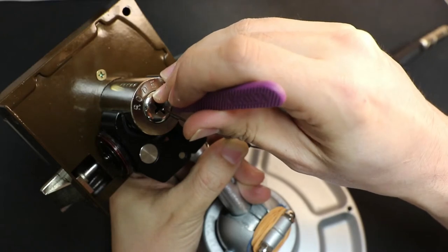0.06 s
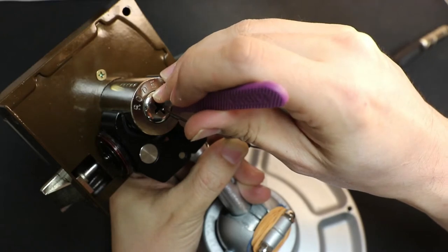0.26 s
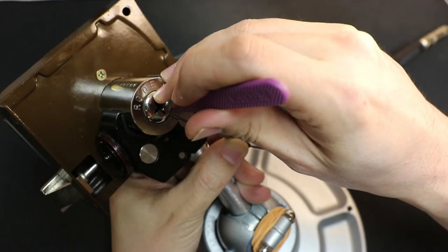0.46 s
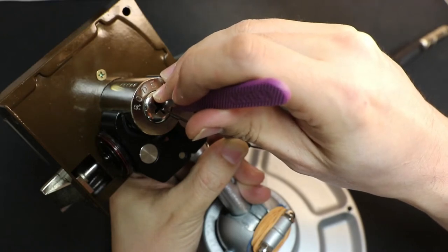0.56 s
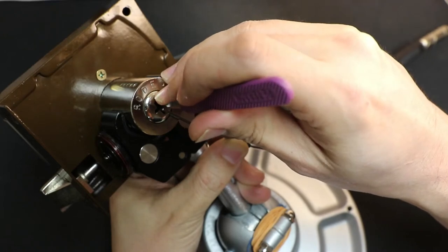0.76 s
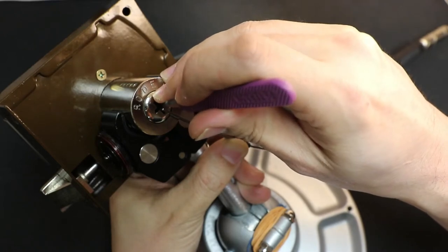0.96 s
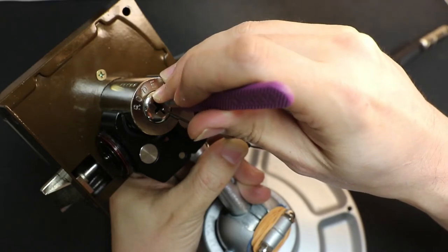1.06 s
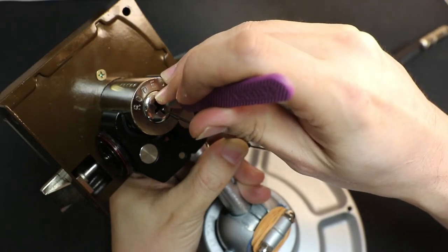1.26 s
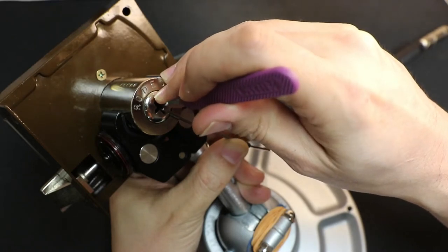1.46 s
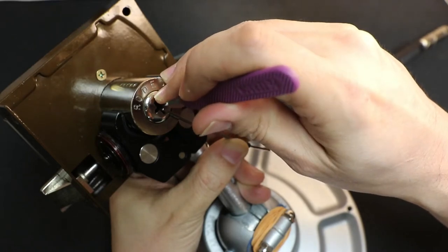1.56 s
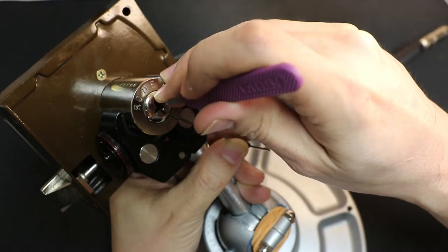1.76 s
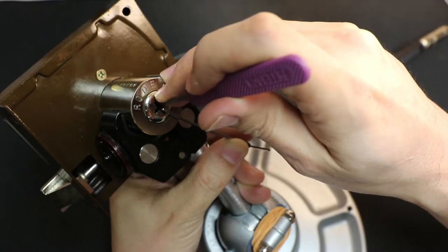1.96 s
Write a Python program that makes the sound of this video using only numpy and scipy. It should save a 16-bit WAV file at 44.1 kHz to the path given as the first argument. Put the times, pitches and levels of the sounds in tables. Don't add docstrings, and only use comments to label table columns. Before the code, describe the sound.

A thin steel pick works the pins of a lock cylinder, giving small ticks and gritty scrapes, then one much louder sharp click just past the middle; close mono microphone in a quiet room with faint hiss and hum.

```python
import sys
import numpy as np
from scipy import signal
from scipy.fft import rfft, irfft, next_fast_len
from scipy.io import wavfile
from scipy.ndimage import uniform_filter1d, map_coordinates

SR = 44100
rng = np.random.default_rng(int(sys.argv[2]) if len(sys.argv) > 2 else 0)


def decibels_to_gain(level_db):
    exponent = np.asarray(level_db, float) / 20
    return 10 ** exponent


def pcm_store(signal):
    levels = np.round(np.clip(np.atleast_2d(signal), -1, 1) * 32767)
    wavfile.write(sys.argv[1], SR, levels.astype(np.int16).T)


N = 88596


def unit(x):
    return x / np.sqrt(np.mean(x ** 2) + 1e-20)


def along(points, hz):
    point_hz, value = np.transpose(points)
    return np.interp(np.log(hz + 1), np.log(point_hz + 1), value)


def wobble(rate_hz):
    knots = rng.standard_normal(int(N * rate_hz / SR) + 4)
    return map_coordinates(knots, [np.arange(N) * rate_hz / SR])


def filtered(x, response):
    size = next_fast_len(len(x) + 4096)
    spectrum = rfft(x, size) * response(np.fft.rfftfreq(size, 1 / SR))
    return irfft(spectrum, size)[:len(x)]


def resonance(f, hz, width_hz):
    return 1j * f * width_hz / (hz * hz - f * f + 1j * f * width_hz)


def room_tone():
    # hz, level_db [dB per Hz]
    rumble = [(15, -14.5), (30, -0.5), (45, -14), (90, -2), (200, -1), (400, -6), (800, -9), (1500, -11.5)]
    # hz, level_db [dB per Hz]
    mic_hiss = [(1500, 1), (3000, -2), (4500, -7), (6500, -6.5), (9000, -6.5), (13000, -16), (15600, -10),
                (15900, -50)]
    # hz, level_db
    mains = [(60, -65), (180, -69.5), (240, -80), (300, -78.5), (420, -78.5), (540, -82.5), (600, -82.5)]
    t = np.arange(N) / SR
    noise = filtered(rng.standard_normal(N), lambda hz: decibels_to_gain(along(rumble, hz) + along(mic_hiss, hz)))
    out = decibels_to_gain(-59 + 0.28 * wobble(4.1)) * unit(noise)
    for hz, db in mains:
        level = np.sqrt(2) * decibels_to_gain(db + 0.6 * wobble(5.8))
        phase = 2 * np.pi * (hz * t + rng.random()) + 0.15 * wobble(3.8)
        out += level * np.sin(phase)
    return out


def rustle():
    # time_s, level_db
    rub = [(0.0, -69.5), (2.01, -71)]
    # hz, level_db [dB per Hz]
    spectrum = [(800, -28), (2500, 6), (6000, -5), (12000, 8), (15600, -4), (15900, -50)]
    time_s, db = np.transpose(rub)
    noise = unit(filtered(rng.standard_normal(N), lambda hz: decibels_to_gain(along(spectrum, hz))))
    sway_db = 1.1 * wobble(25.3) + 1.3 * wobble(150)
    return decibels_to_gain(np.interp(np.arange(N) / SR, time_s, db) + sway_db) * noise


def scrapes():
    # start_s, length_s, level_db, pitch_hz
    strokes = [(.085, 0.058, -65, 1770), (.172, 0.048, -67, 3270), (0.245, .012, -59, 7440),
               (0.276, 0.023, -61, 2510), (.37, 0.021, -64, 3130), (0.447, 0.024, -59, 3440),
               (0.477, 0.0094, -54.5, 4500), (0.487, 0.016, -59, 3200), (.666, 0.017, -57, 2450),
               (.745, 0.018, -55, 6200), (.748, .012, -62, 2430), (.914, 0.015, -64, 5040),
               (1.236, 0.009, -59, 3300), (0.929, 0.015, -58, 6000), (0.945, 0.019, -60, 6140),
               (1.068, 0.046, -65, 2460), (1.111, 0.03, -56.5, 2500), (1.111, 0.022, -54.5, 7460),
               (1.114, 0.023, -59, 4170), (.575, .012, -63, 2450), (0.859, 0.011, -62, 2700),
               (1.869, 0.038, -65.5, 5000), (0.541, .007, -55.5, 7600), (.542, 0.0069, -55, 2420),
               (0.72, 0.0072, -54, 9700), (.376, .014, -63, 8800), (0.273, .03, -72, 8900)]
    q, grit_db = 8.5, 2.5
    out = np.zeros(N + SR)
    for start_s, length_s, db, hz in strokes:
        noise, grit = rng.standard_normal((2, int(length_s * SR)))
        grit = noise * decibels_to_gain(grit_db * unit(uniform_filter1d(grit, size=30)))
        tone = filtered(grit, lambda f: resonance(f, hz, hz / q))
        envelope = np.sqrt(np.hanning(len(tone)))
        out[round(start_s * SR):][:len(tone)] += decibels_to_gain(db) * unit(tone) * envelope
    return out[:N]


def ring(modes, blow):
    detune, scatter_db = 0.0031, 2
    hz, width_hz, db = np.transpose(modes)[:, :, None]
    pitch_luck, level_luck = rng.standard_normal((2, len(modes), 1))
    sign = (-1.) ** np.arange(len(modes))[:, None]
    hz = hz * (1 + detune * pitch_luck)
    gain = sign * decibels_to_gain(db + scatter_db * level_luck)
    out = filtered(blow, lambda f: np.sum(gain * resonance(f, hz, width_hz), axis=0))
    return out / np.abs(out).max()


def pins():
    # start_s, pick_db, cylinder_db, chatter_ms
    ticks = [(0.1706, -48, -50, 2.4), (0.1783, -46, -42, 2.4), (0.182, -41, -48, 2.4),
             (0.1901, -44, -47, 2), (0.1991, -37, -43, 1.6), (0.203, -41, -47, 2.4),
             (0.2329, -43.5, -48, 2), (0.2463, -46, -49, 1.7), (0.3834, -33.5, -44.5, 1.6),
             (0.4777, -49, -46.5, 1.5), (0.5023, -43.5, -50, 1.7), (0.543, -57, -46, 2.4),
             (0.5791, -55, -48.5, 2.3), (0.657, -45.5, -53, 2.2), (0.6643, -38, -46.5, 2),
             (0.6716, -46, -45, 1.8), (0.7194, -34, -45, 2), (0.7216, -34, -41, 1.4),
             (0.7339, -35, -45, 2.5), (0.7556, -38.5, -51, 1.4), (0.8607, -53, -49, 2),
             (0.9151, -39.5, -40, 2.4), (0.9345, -46, -46, 2.3), (0.9501, -43, -52, 2.5),
             (1.1154, -46, -40, 2), (1.1214, -40, -39, 2.4), (1.2394, -47, -46, 2), (1.8761, -43, -53, 3.8),
             (1.9064, -48, -55, 2), (1.9711, -44, -46, 1.2)]
    # start_s, pick_db, cylinder_db, chatter_ms
    setting_pin = [
        (1.148, -31, -37, 3),
        (1.1502, -23, -35, 2.2),
        (1.1514, -11, -18, 1.7),
        (1.1524, -19, -31, 1.2),
        (1.1534, -13, -28, 1),
        (1.155, -17.5, -27.5, 1.9),
        (1.1577, -26.5, -33, 2.4),
        (1.16, -33, -31, 2),
    ]
    # hz, width_hz, level_db
    snap_modes = [(6440, 1540, -5.5), (10620, 3300, -1.5), (13730, 1900, -2)]
    # hz, width_hz, level_db
    pick_modes = [(6280, 85, 0), (6950, 220, -3), (7100, 126, 5.5), (8120, 340, -4.5), (8620, 140, -0.5),
                  (9600, 170, 4), (10380, 350, 4), (10700, 660, -11.5), (12500, 750, -8), (13900, 430, -12),
                  (14300, 530, -13)]
    # hz, width_hz, level_db
    cylinder_modes = [(424, 68, -11.5), (641, 42, -3), (890, 170, -15), (1372, 163, -6.5), (2089, 74, -1),
                      (2429, 69, 4.5), (2700, 190, -5), (3271, 62, 0.5), (3900, 560, -11),
                      (4530, 236, -3.5)]
    chatter_db, snap_db, ring_db, knock_db = -21, -1.5, -6, -3.5
    out, t = np.zeros(N + SR), np.arange(4096) / SR
    for start_s, pick_db, cylinder_db, chatter_ms in list(ticks) + list(setting_pin):
        decay = np.exp(-t * 1000 / max(chatter_ms, 0.1))
        blow = decibels_to_gain(chatter_db) * rng.laplace(size=len(t)) * decay
        blow[0] = 1
        pick = decibels_to_gain(snap_db) * ring(snap_modes, blow) + decibels_to_gain(ring_db) * ring(pick_modes, blow)
        cylinder = decibels_to_gain(cylinder_db + knock_db) * ring(cylinder_modes, blow)
        out[round(start_s * SR):][:len(t)] += decibels_to_gain(pick_db) * pick + cylinder
    return out[:N]


def room(x):
    # hz, t60_s
    decay = [(500, 0.17), (3000, 0.12), (8000, 0.071), (15000, 0.083)]
    hz, t, z = signal.stft(rng.standard_normal(SR // 3), SR, nperseg=256)
    fade = decibels_to_gain(-60 * t / along(decay, hz)[:, None])
    tail = signal.istft(z * fade, SR, nperseg=256)[1]
    delayed = np.pad(x, (130, 0))
    return signal.fftconvolve(delayed, tail / np.linalg.norm(tail))[:N]


def knocks():
    # start_s, level_db, hz, t60_s
    handle_knocks = [
        (.27, -56.5, 95, 0.27),
        (.668, -56, 641, 0.17),
        (.725, -51.5, 171, 0.18),
        (.735, -54, 905, 0.073),
        (.917, -42.5, 862, 0.053),
        (.925, -53.5, 641, 0.15),
        (1.152, -48.5, 641, 0.31),
    ]
    out, t = np.zeros(N + SR), np.arange(SR // 4) / SR
    onset = 1 - np.exp(-t / 0.0025)
    for start_s, db, hz, t60_s in handle_knocks:
        knock = decibels_to_gain(db - 60 * t / t60_s) * onset * np.sin(2 * np.pi * hz * t)
        out[round(start_s * SR):][:len(t)] += knock
    return out[:N]


def scene():
    lock = filtered(pins() + scrapes(),
                    lambda hz: hz ** 4 / (hz ** 4 + 330 ** 4) / (1 + (hz / 15600) ** 24))
    mono = lock + decibels_to_gain(-9.5) * room(lock) + knocks() + rustle() + room_tone()
    side = decibels_to_gain(-35) * filtered(room(lock), lambda hz: hz > 4500)
    return np.array([mono + side, mono - side])


def roll_off(x):
    return signal.sosfilt(signal.butter(12, 16650, fs=SR, output="sos"), x)


def record(dry):
    return roll_off(dry)


dry = scene()
out = record(dry)
pcm_store(out)
```